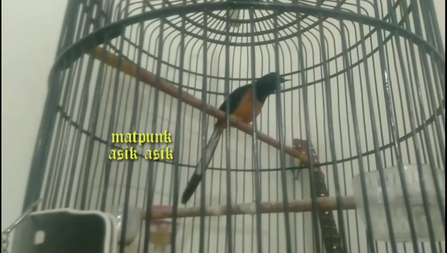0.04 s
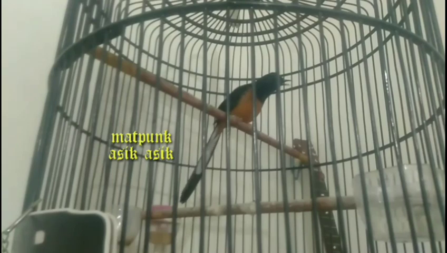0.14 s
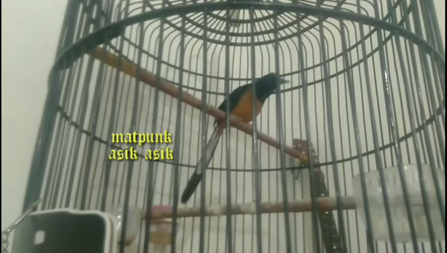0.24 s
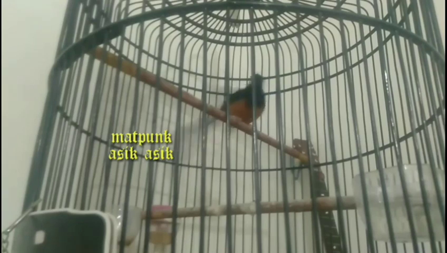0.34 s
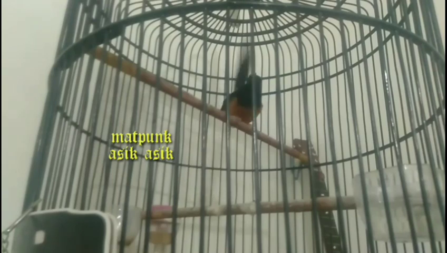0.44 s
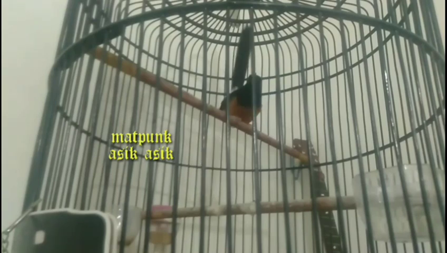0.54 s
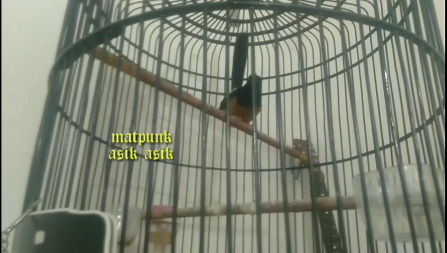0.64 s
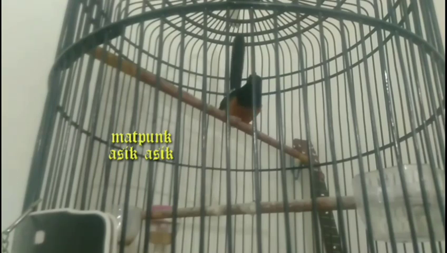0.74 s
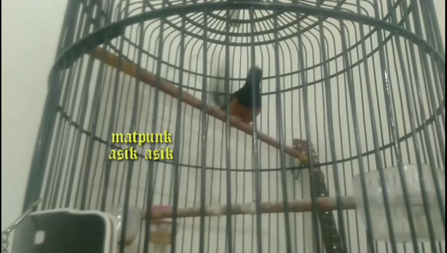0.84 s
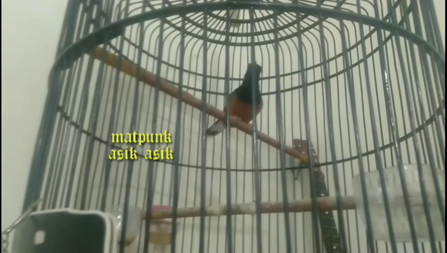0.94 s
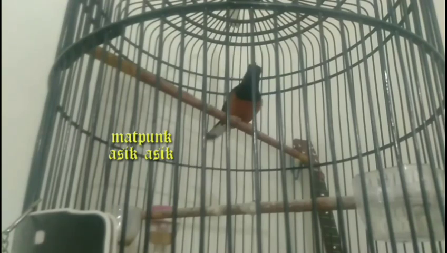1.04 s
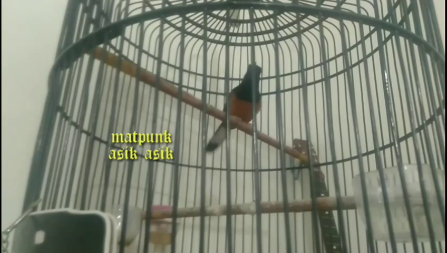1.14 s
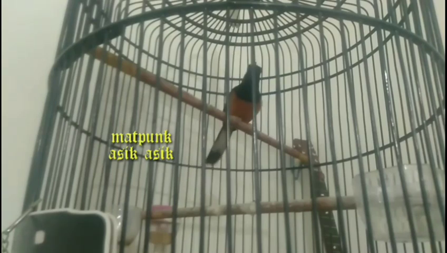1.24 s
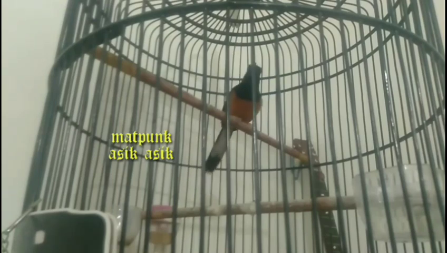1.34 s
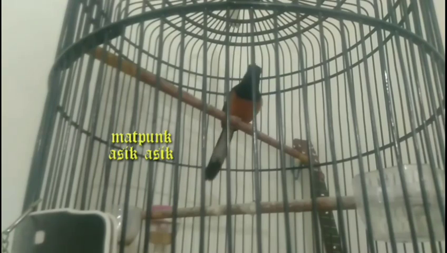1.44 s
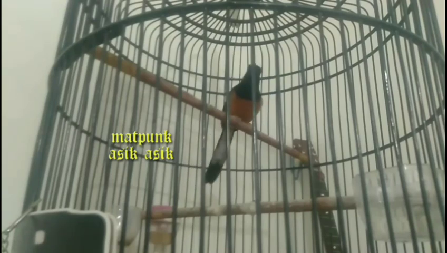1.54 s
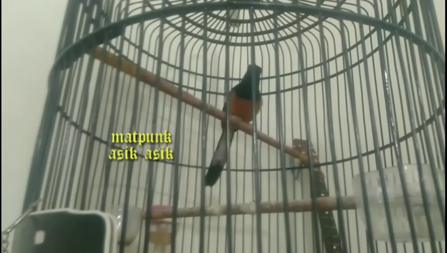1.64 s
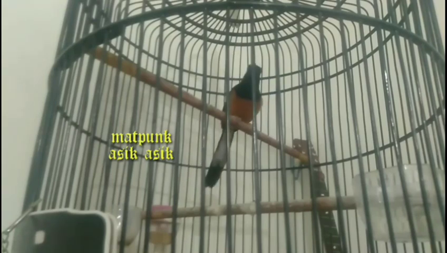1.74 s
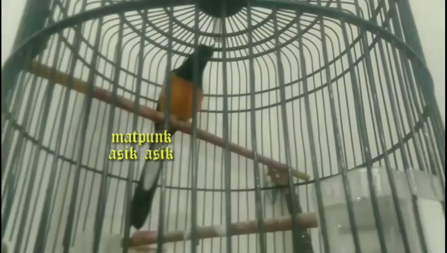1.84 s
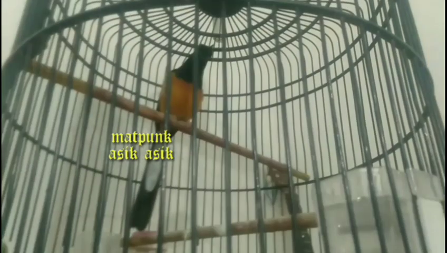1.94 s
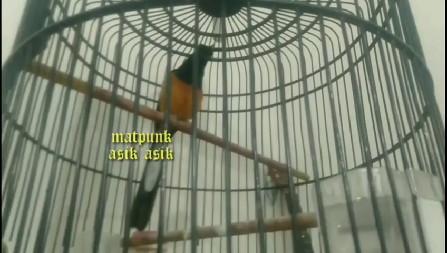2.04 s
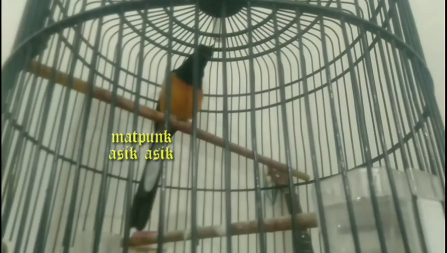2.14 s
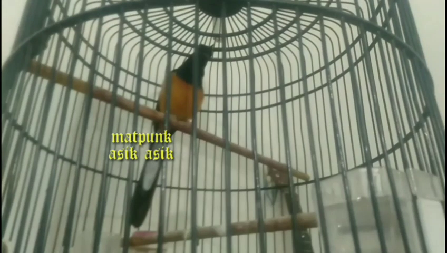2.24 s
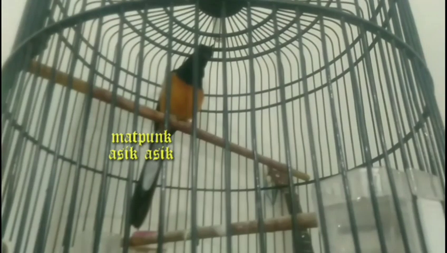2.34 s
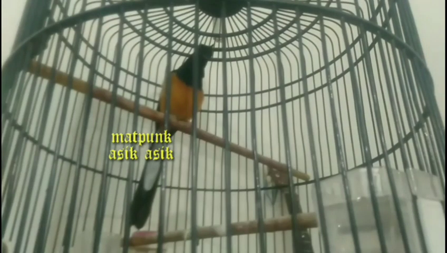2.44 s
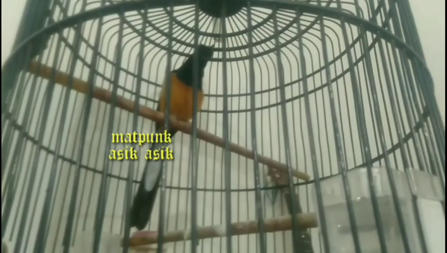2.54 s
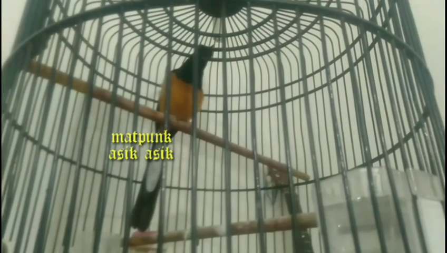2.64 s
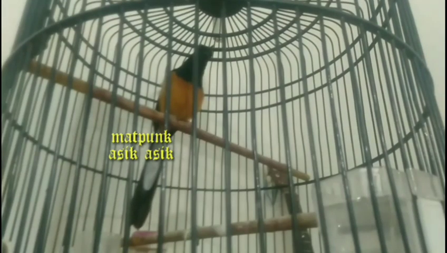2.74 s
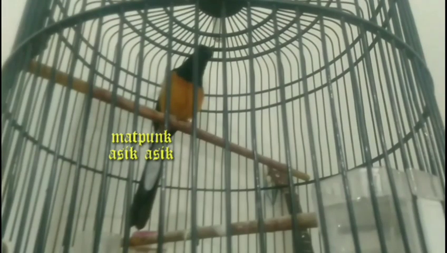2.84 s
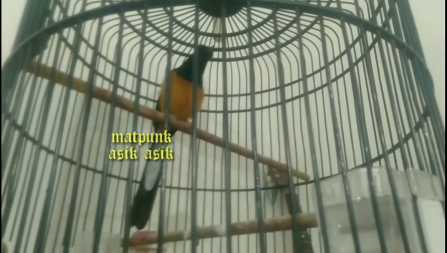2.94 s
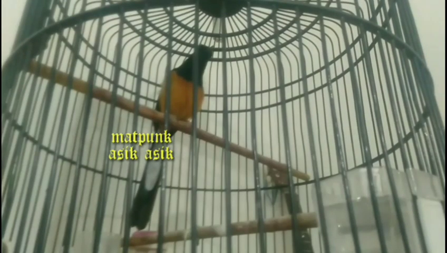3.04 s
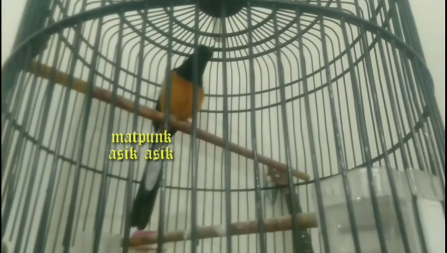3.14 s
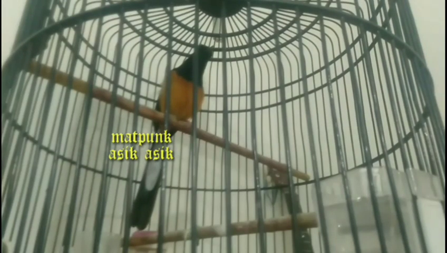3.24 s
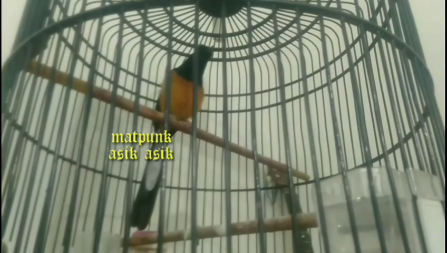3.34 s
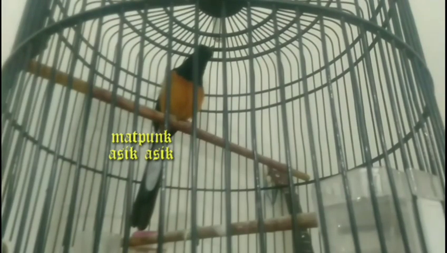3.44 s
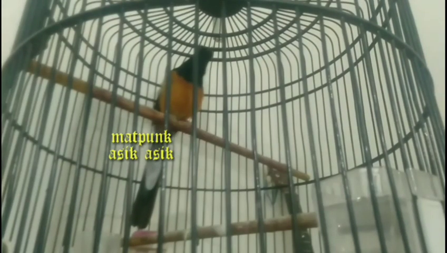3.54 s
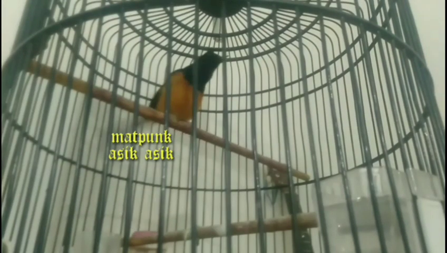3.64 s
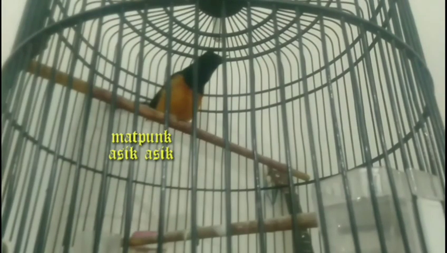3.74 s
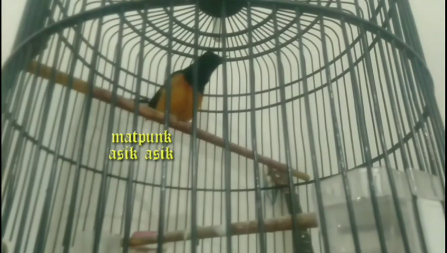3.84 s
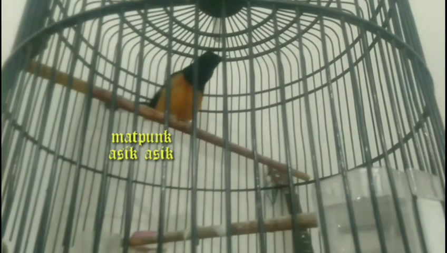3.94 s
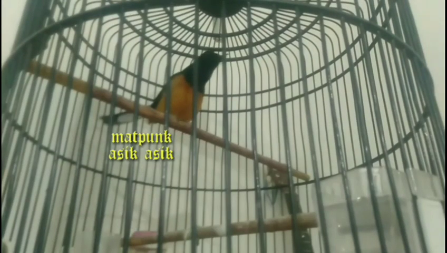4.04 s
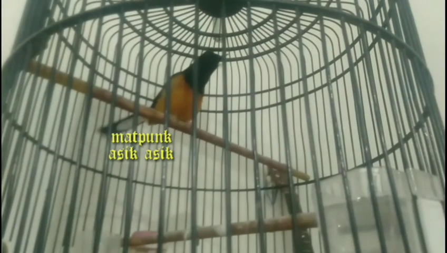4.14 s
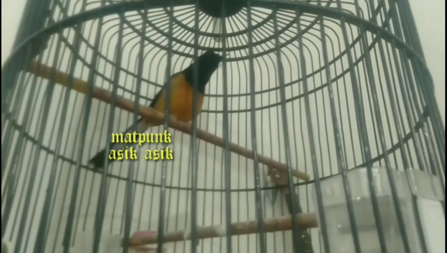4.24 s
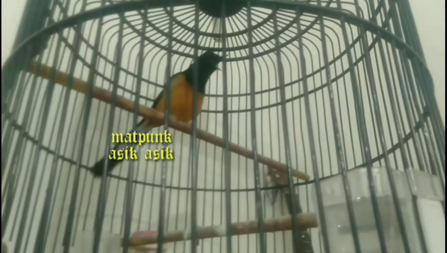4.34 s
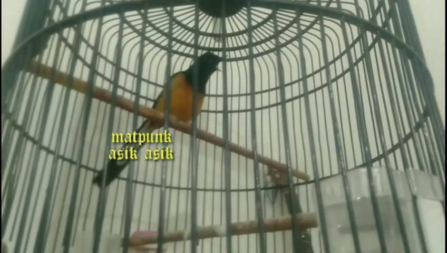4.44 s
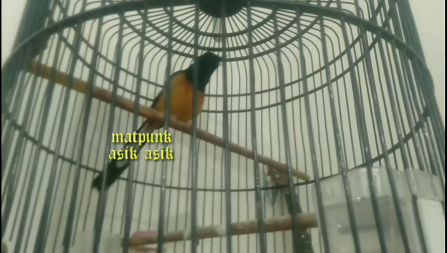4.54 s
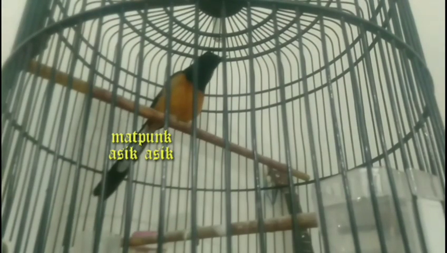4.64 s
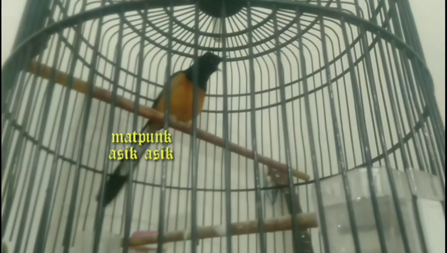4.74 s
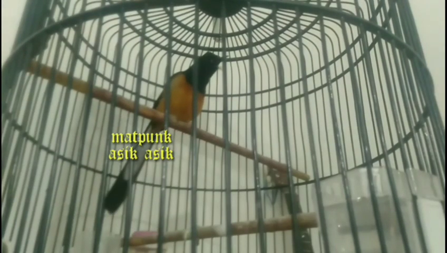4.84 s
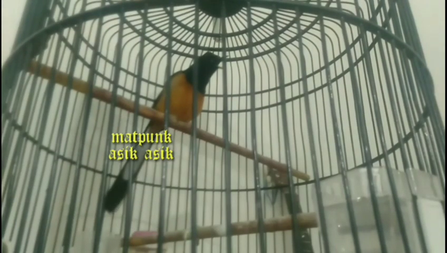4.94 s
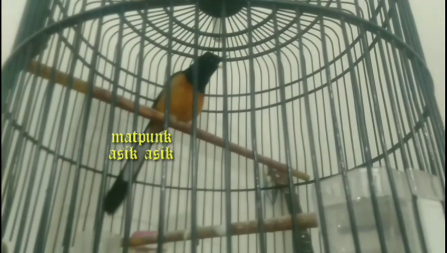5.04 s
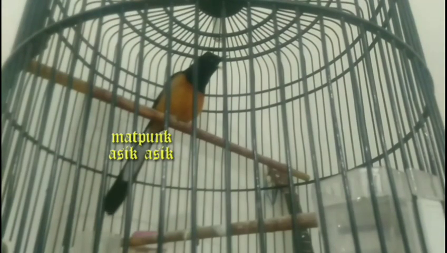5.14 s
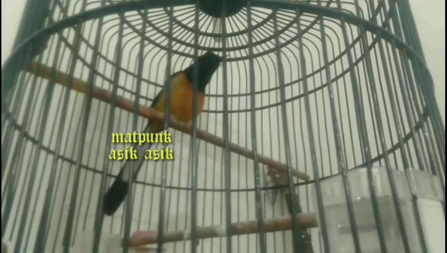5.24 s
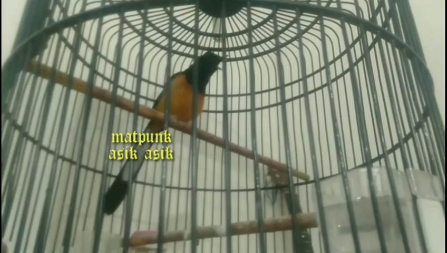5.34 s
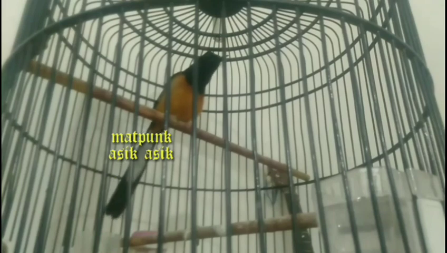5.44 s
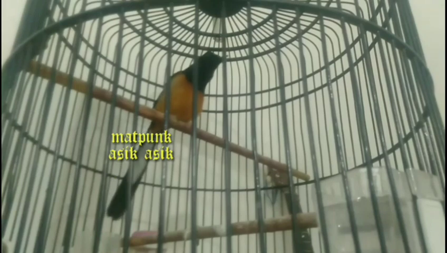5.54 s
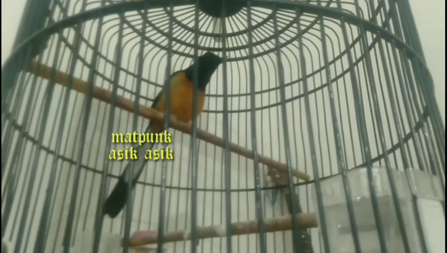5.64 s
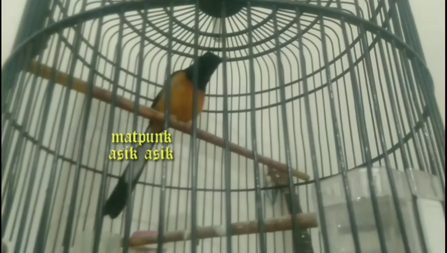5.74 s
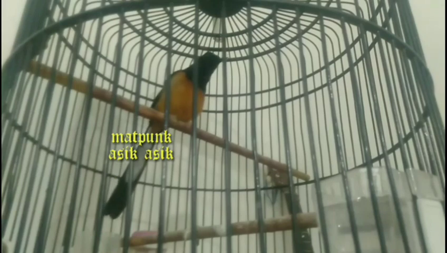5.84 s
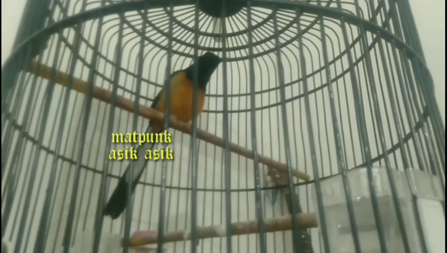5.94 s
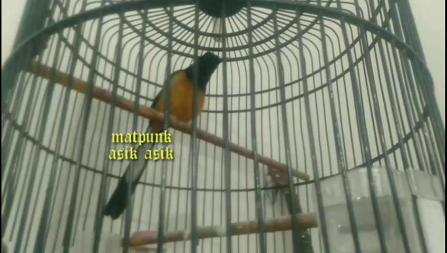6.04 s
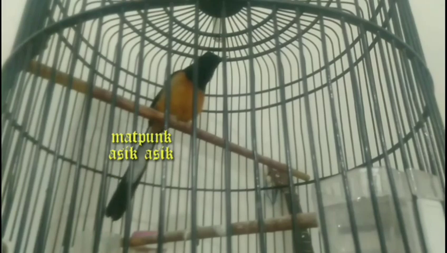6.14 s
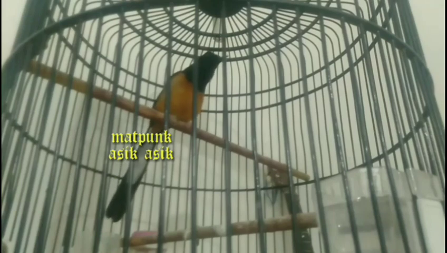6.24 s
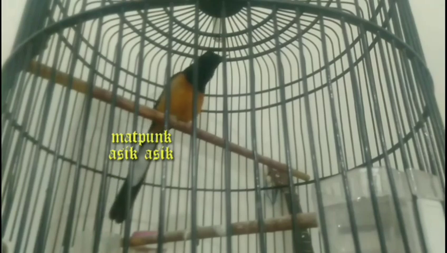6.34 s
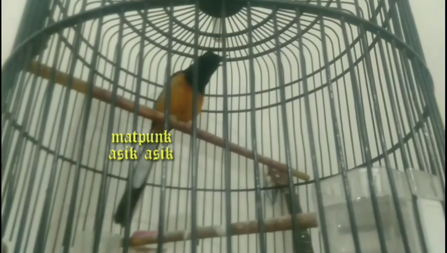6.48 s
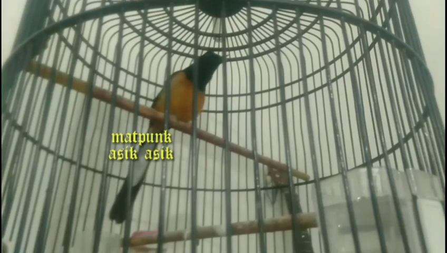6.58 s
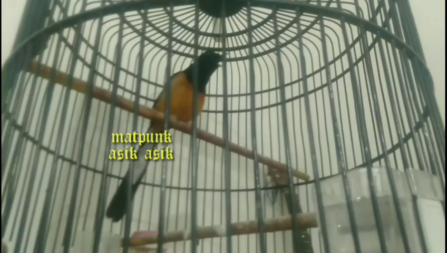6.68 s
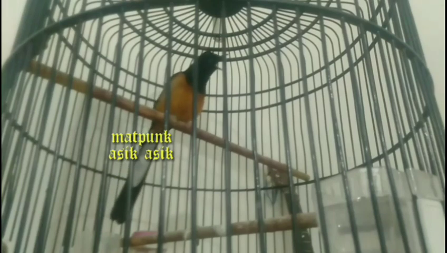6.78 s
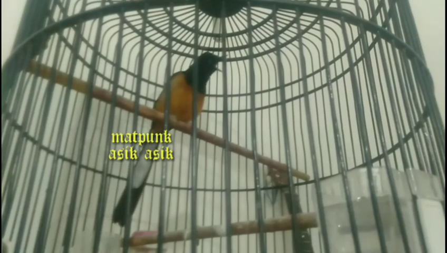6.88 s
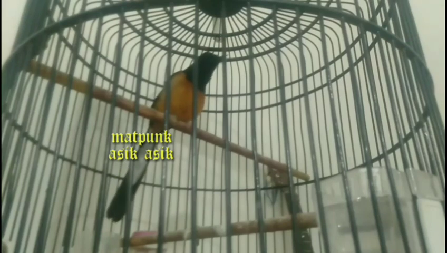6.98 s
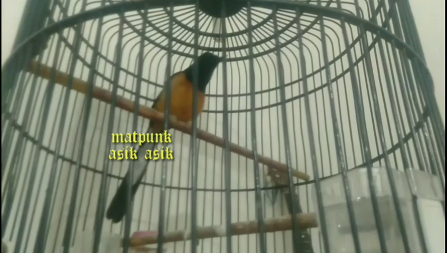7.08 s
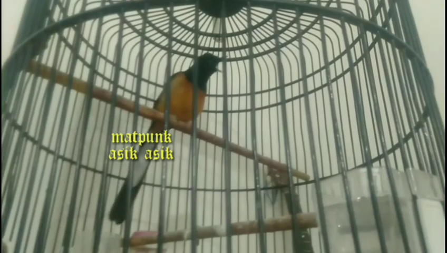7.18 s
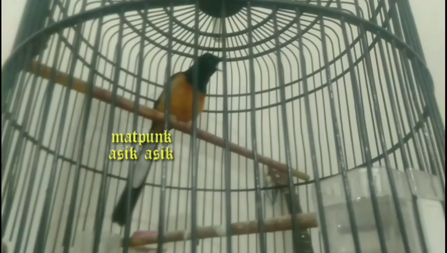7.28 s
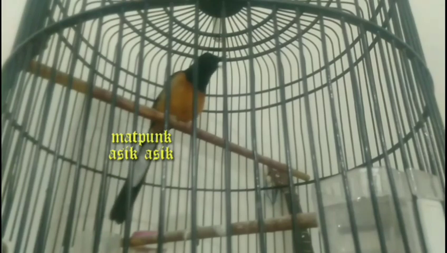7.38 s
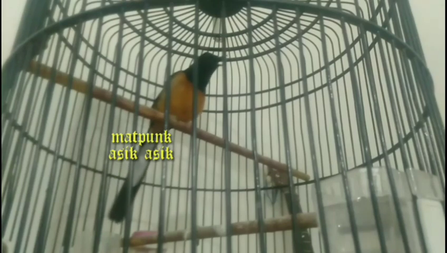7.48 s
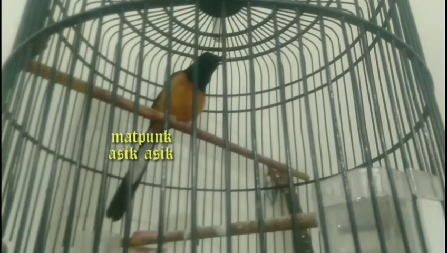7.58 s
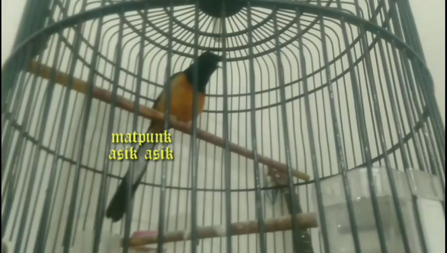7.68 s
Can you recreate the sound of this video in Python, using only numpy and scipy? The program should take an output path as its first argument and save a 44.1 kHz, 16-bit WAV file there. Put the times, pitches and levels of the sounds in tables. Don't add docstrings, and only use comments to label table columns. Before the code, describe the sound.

A caged songbird sings loud piercing whistles, rattling chirps and quick warbles close up in a bare echoing room, with one sharp dry click.

```python
import sys
import numpy as np
from scipy import signal
from scipy.fft import rfft, irfft
from scipy.io import wavfile
from scipy.ndimage import uniform_filter1d

SR = 44100
rng = np.random.default_rng(int(sys.argv[2]) if len(sys.argv) > 2 else 0)


def gain_from_db(level_db):
    decades = np.asarray(level_db, float) / 20
    return 10 ** decades


def bounce(signal):
    frames = np.transpose(np.atleast_2d(signal))
    limited = np.clip(frames, -1, 1)
    pcm = np.round(limited * 32767).astype(np.int16)
    wavfile.write(sys.argv[1], SR, pcm)


N = 340011
T = np.arange(N) / SR
HOARSE = 0.05


def noise(hz_lo, hz_hi):
    band = signal.butter(2, [hz_lo, hz_hi], "band", fs=SR, output="sos")
    x = signal.sosfilt(band, rng.standard_normal(N))
    return x / x.std()


def coloured(points, size=N):
    even = size + size % 2
    hz, db = np.transpose(points)
    log_hz = np.log(np.arange(even // 2 + 1) * SR / even + 1)
    x = irfft(rfft(rng.standard_normal(even)) * gain_from_db(np.interp(log_hz, np.log(hz), db)), even)
    return x[:size] / x.std()


def tracks(notes, edge_s=0.0012):
    hz, size = np.zeros(N), np.zeros(N)
    for s, f, db in map(np.transpose, notes):
        on = (T >= s[0]) & (T < s[-1])
        edge = np.clip(np.minimum(T[on] - s[0], s[-1] - T[on]) / edge_s, 0, 1)
        hz[on] = uniform_filter1d(np.interp(T[on], s, f), size=300, mode="nearest")
        size[on] = np.sqrt(2) * gain_from_db(np.interp(T[on], s, db)) * edge
    return hz, size


def shaped(shape, rows):
    return [[(s + u * length, from_hz + (to_hz - from_hz) * glide, db + rel_db) for u, glide, rel_db in shape]
            for s, length, from_hz, to_hz, db in rows]


def breathed(courses, breath, levels_db):
    out = []
    u, rel_db = np.transpose(breath)
    for (s, hz), db in zip(map(np.transpose, courses), levels_db):
        at = s[0] + u * (s[-1] - s[0])
        t = np.union1d(s, at)
        out.append(np.transpose([t, np.interp(t, s, hz), db + np.interp(t, at, rel_db)]))
    return out


def phase_of(hz, jitter=0.0031):
    return 2 * np.pi * np.cumsum(hz * (1 + jitter * noise(20, 210))) / SR


def sing(phase, size, overtones_db):
    on, out = size > 0, np.zeros(N)
    step, turn = np.gradient(phase)[on], phase[on]
    haze = 1 + gain_from_db(-13) * noise(100, 750)[on]
    tone = np.sin(turn)
    for k, db in enumerate(overtones_db, 2):
        below_nyquist = k * step < 2.6
        tone += haze * gain_from_db(np.broadcast_to(db, N)[on]) * np.sin(k * turn) * below_nyquist
    shimmer = gain_from_db(1.5 * noise(27, 110)[on])
    out[on] = tone * size[on] * shimmer
    return out


def voice(notes, overtones_db, jitter=.003):
    hz, size = tracks(notes)
    return sing(phase_of(hz, jitter), size, overtones_db)


# (frequency [Hz], level [dB])
TRACT = [(1500, -17.5), (2300, -35.5), (3500, -50), (4700, -45.5), (5700, -51.5), (6500, -53), (7600, -35),
         (10000, -37), (13000, -13), (16000, -32)]
OVERTONES_DB = [5, 2, 2.5, 1.5]


def overtones(hz):
    tract_hz, keep_db = np.transpose(TRACT)
    levels = []
    for k, db in enumerate(OVERTONES_DB, 2):
        thinning_db = -8 * (k - 2) * np.log2(hz / 1200 + 0.08)
        levels.append(db + thinning_db + np.interp(np.log(k * hz + 1), np.log(tract_hz), keep_db))
    return levels


# (resonance [Hz], half width [Hz], leak [dB], octave [dB],
# rasp [dB], rasp from [Hz], rasp to [Hz])
THROATS = [
    (4750, 350, -2.5, -23, -25.5, 3300, 20000),
    (3103, 520, -33, -74.5, -53, 4300, 6000),
]


def through_throat(hz, size, throat, jitter):
    centre_hz, width_hz, leak_db, octave_db, rasp_db, *rasp_hz = throat
    phase = phase_of(hz, jitter)
    gain = 1 / (1 + ((hz - centre_hz) / width_hz) ** 2) + gain_from_db(leak_db) * (hz < centre_hz)
    escaped = gain_from_db(octave_db) * np.sin(2 * phase) + gain_from_db(rasp_db) * noise(*rasp_hz)
    return sing(phase, size * gain, overtones(hz)) + size * escaped


MIXES = [(2, 0), (1, 1), (2, 1), (-1, 1), (3, -1), (-1, 2), (3, 0)]
MIX_DB = [-10.5, -14.5, -20.5, -24, -20, -30, -20]


def duet(left, left_size, notes, overtones_db, mix_db, jitter=0.0027, order=0):
    hz, size = tracks(notes)
    right = phase_of(hz, jitter)
    out, on = sing(right, size, overtones_db), size > 0
    left_step, right_step = np.gradient([left, right], axis=1)[:, on]
    both = np.sqrt(left_size * size)[on]
    for (m, n), db in zip(MIXES[order:], MIX_DB[order:]):
        step = m * left_step + n * right_step
        audible = np.clip(step / 0.17 - 1, 0, 1) * (step < 2.6)
        out[on] += gain_from_db(db + mix_db) * both * np.sin(m * left[on] + n * right[on]) * audible
    return out


# (frequency [Hz], density [dB per Hz])
RUMBLE = [(15, -20), (25, -9), (42, -10), (52, 2), (62, -5), (79, -4), (120, -13), (155, -11), (200, -17),
          (260, -20), (340, -40)]
# (time [s], level [dB])
TRAFFIC = [(0, -47), (.8, -44), (1.15, -50.5), (1.8, -46), (2.0, -52.5), (3.7, -50.5), (4.0, -58.5),
           (4.5, -56), (5.1, -49.5), (5.75, -56.5), (6.2, -51), (7.71, -50)]
# (frequency [Hz], density [dB per Hz])
HUM = [(150, -21), (260, -11), (498, -10.5), (581, -6.5), (1150, -17), (1280, -13), (3810, -26),
       (4680, -35), (15500, -25.5)]


def background():
    traffic_db = np.interp(T, *np.transpose(TRAFFIC)) - noise(0.89, 2.9)
    hum_db = -56 + 0.34 * noise(0.89, 2.4)
    return coloured(RUMBLE) * gain_from_db(traffic_db) + coloured(HUM) * gain_from_db(hum_db)


# (share of length [0-1], share of glide [0-1], level [dB])
FAR_FADE = [(0, 0.1, -13), (.15, 0.0018, 3.5), (.6, 0.53, -3.5), (1, 0.94, -7)]
# (time [s], length [s], from [Hz], to [Hz], level [dB])
FAR_FADES = [
    (.0, 0.009, 2254, 1510, -27.5),
    (1.42, 0.33, 2464, 2345, -32),
]
# (share of length [0-1], share of glide [0-1], level [dB])
FAR_ARCH = [(0, 0, -3), (.3, 1, 0), (1, .4, -1.5)]
# (time [s], length [s], from [Hz], to [Hz], level [dB])
FAR = [
    (1.768, .13, 2830, 3050, -43),
    (3.6, .16, 3400, 3100, -60),
    (1.99, .13, 1790, 1810, -42),
    (2.95, .64, 620, 590, -60),
    (3.8, .05, 4400, 4900, -49),
    (6.17, .09, 1900, 2400, -52),
]
# (time [s], length [s], from [Hz], to [Hz], level [dB])
FAR_OVER = [
    (3.185, .085, 4300, 4750, -53),
]


def far_birds():
    others = voice(shaped(FAR_ARCH, FAR) + shaped(FAR_FADE, FAR_FADES), [-30], jitter=.006)
    return others + voice(shaped(FAR_ARCH, FAR_OVER), [-30], jitter=.006)


# (frequency [Hz], t60 [s], level [dB])
ROOM = [(520, 0.2, -9), (1200, 0.54, -2), (2400, 0.51, -2), (4000, 0.45, -1), (6800, 0.39, -4),
        (14900, 0.31, 5.5)]
# (delay [s], level over the tail [dB])
ECHOES = [
    (.0032, 12.5),
    (.009, 9),
    (.016, 10.5),
]


def room():
    t, tail = T[:SR], 0
    for hz, t60, db in ROOM:
        around = [(hz / 2.42, -40), (hz / 1.4, 0), (hz * 1.085, 0), (hz * 4.5, -40)]
        tail = tail + gain_from_db(db - 60 * t / t60) * coloured(around, size=SR) * np.sqrt(hz)
    clusters = sum(gain_from_db(db) * np.exp(-((t - s) / 0.00064) ** 2) for s, db in ECHOES)
    build_up = 1 - np.exp(-t / .008)
    tail = tail * (build_up + clusters)
    return tail * gain_from_db(2) / np.sqrt(np.sum(tail ** 2))


# (time [s], length [s], from [Hz], to [Hz], level [dB])
OPENING = [(0, .05, -41.5), (.3, .2, -22.5), (.47, .4, 3.5), (.66, .7, -1.5), (.82, .94, -8.5),
           (1, 1, -9.5)]
OPENINGS = [
    (.037, .053, 3689, 5220, -6),
    (1.25, .058, 3558, 5437, -10.5),
]
SCOOP = [(0, 0, -21), (.32, .6, 3), (.55, 0.91, -1), (1, 1, 0.5)]
SCOOPS = [
    (4.392, .036, 1950, 2350, -21),
    (5.415, .054, 1950, 2430, -10.5),
]
JUMP = [(0, 0, -3), (.1, .72, 0), (.25, .96, 0), (.9, 1, -1), (1, 0.95, -12)]
JUMPS = [
    (4.238, .08, 2099, 2372, -7.5),
    (6.55, .103, 2050, 2440, -6.5),
]
DROP = [(0, 0.085, -22.5), (.12, 0.064, -7), (.5, .3, 3), (.75, .58, -3), (1, 0.94, -8.5)]
DROPS = [
    (4.738, .11, 1586, 965.4, -14.5),
    (7.156, .098, 1571, 931, -14.5),
]
# (time [s], pitch [Hz], level [dB])
BENDS = [
    [(.971, 1397, -35.5), (.979, 1478, -20.5), (.99, 1776, -13), (1.01, 1813, -13.5), (1.03, 2171, -7.5),
     (1.048, 2400, -4), (1.075, 2423, -9), (1.088, 2400, -14.5)],
    [(3.684, 741, -48.5), (3.69, 988, -35), (3.712, 1073, -14), (3.728, 1134, -31), (3.74, 1154, -20),
     (3.752, 1144, -21), (3.762, 1037, -12), (3.768, 933, -26), (3.774, 828, -30.5)],
    [(3.824, 1412, -31.5), (3.835, 1606, -20), (3.852, 1769, -1), (3.885, 1950, -13), (3.91, 2060, -3),
     (3.94, 2160, -17.5), (3.96, 2200, -20), (3.99, 2210, -13.5), (4.025, 2206, -22)],
]
# (time [s], pitch [Hz], level [dB])
RISES = [
    [(4.084, 1417, -35), (4.105, 1447, -20), (4.14, 1493, -15.5), (4.15, 1484, -3), (4.172, 1508, -10),
     (4.2, 1573, -13.5), (4.222, 1697, -15), (4.237, 1842, -10.5)],
    [(6.283, 700, -54), (6.291, 997, -35.5), (6.33, 1120, -22.5), (6.405, 1137, -31), (6.414, 1173, -11.5),
     (6.436, 1239, -11), (6.445, 1259, -5.5), (6.48, 1318, -11.5), (6.515, 1456, -12), (6.548, 1758, -11)],
]
# (time [s], pitch [Hz])
SWEEPS = [
    [(2.603, 2780), (2.654, 2830), (2.7, 3050), (2.734, 3300), (2.82, 3880), (2.85, 3890)],
    [(4.428, 2420), (4.45, 2650), (4.47, 2960), (4.49, 3130), (4.55, 3300), (4.6, 3500), (4.67, 3880),
     (4.688, 3880)],
    [(5.469, 2720), (5.515, 2900), (5.579, 2950), (5.607, 2880), (5.622, 2620), (5.64, 2230), (5.67, 2050)],
    [(6.765, 1700), (6.779, 2060), (6.8, 2250), (6.83, 2400), (6.87, 2620), (6.892, 2900), (6.95, 3120),
     (7.0, 3400), (7.06, 3965), (7.088, 3965)],
]
# (share of length [0-1], level [dB]), and each one's level [dB]
SWEEP_BREATH = [(0, -11), (.06, -3), (.3, -5.5), (0.547, -3.5), (0.922, -4.5), (1.001, -6)]
SWEEP_DB = [-8, -6, -6, -5.5]
# (time [s], pitch [Hz])
FALLS = [
    [(1.977, 4310), (1.995, 4290), (2.027, 4120), (2.1, 3930), (2.125, 3850), (2.163, 3890)],
    [(4.902, 4340), (4.95, 4010), (4.975, 3900), (5.008, 3760), (5.028, 3500), (5.05, 3530)],
]
# (share of length [0-1], level [dB]), and each one's level [dB]
FALL_BREATH = [(0, -24), (.05, -12.5), (.35, -12), (.7, -7.5), (0.849, 1.5), (1, -7.5)]
FALL_DB = [-6, -6]
# (time [s], pitch [Hz])
LAST_FALL = [
    [(7.31, 4455), (7.338, 4372), (7.39, 4175), (7.436, 3884), (7.45, 3800), (7.468, 3125), (7.484, 2888),
     (7.499, 3100)],
]
# (share of length [0-1], level [dB]), and its level [dB]
LAST_FALL_BREATH = [(0, -16), (.13, -3.5), (.36, -24.5), (0.561, -11), (0.681, -0.5), (0.93, -6), (1, -6.5)]
LAST_FALL_DB = [-5.5]


def whistles():
    long_notes = breathed(SWEEPS, SWEEP_BREATH, SWEEP_DB) + breathed(FALLS, FALL_BREATH, FALL_DB)
    long_notes += breathed(LAST_FALL, LAST_FALL_BREATH, LAST_FALL_DB)
    short_notes = shaped(OPENING, OPENINGS) + shaped(SCOOP, SCOOPS) + shaped(JUMP, JUMPS) + shaped(DROP, DROPS)
    return BENDS + RISES + long_notes + short_notes


# (from [s], to [s], rate [Hz], depth [0-1], extra push [dB])
FLUTTER = [(.985, 1.03, 150, .85, 4), (1.03, 1.09, 110, .7, 1), (2.588, 2.7, 54, 1, 2),
           (2.7, 2.78, 48, .6, 0), (4.178, 4.236, 47, .9, 3), (4.252, 4.318, 52, .6, 0),
           (4.43, 4.68, 55, .6, 0), (5.475, 5.625, 44, .8, 1), (5.625, 5.67, 44, .8, -4),
           (6.478, 6.55, 70, .9, 2), (6.6, 6.655, 70, .5, 0), (6.8, 6.835, 52, .6, 0),
           (6.835, 6.89, 60, 1, 0), (6.89, 7.06, 52, .6, 0)]


def flutter():
    gain, bend, rough = np.ones(N), np.zeros(N), noise(60, 360)
    sharpness = 1.6
    for start, end, hz, depth, push_db in FLUTTER:
        on = (T >= start) & (T < end)
        turn = 2 * np.pi * hz * (T[on] - start)
        pulse = sharpness ** .5 * (.5 + .5 * np.sin(turn)) ** sharpness
        gain[on] = gain_from_db(push_db) * (1 - depth + 2 * depth * pulse)
        bend[on] = depth ** 2 * (.025 * rough[on] - .03 * np.cos(turn))
    smooth_gain = uniform_filter1d(uniform_filter1d(gain, size=110), size=110)
    return smooth_gain, 1 + bend


def left_voice():
    hz, size = tracks(whistles())
    breath, bend = flutter()
    phase = phase_of(hz * bend)
    richness_db = 8 - 0.68 * 20 * np.log10(size * 10 + 0.21)
    return phase, size, sing(phase, size * breath, overtones(hz) + richness_db)


# (share of length [0-1], share of glide [0-1], level [dB])
PAIR = [(0, .4, -30), (.3, .15, -12), (.5, 0.025, -2), (.6, .02, -10), (.72, 0.03, -5), (.78, .12, -17),
        (.85, .45, -25), (1, 0.97, -25)]
# (time [s], length [s], from [Hz], to [Hz], level [dB])
PAIRED = [
    (0.054, .075, 2949, 1394, -4),
    (1.278, .062, 3340, 1623, -6.5),
]


def harsh_under_notes(left, left_size):
    return duet(left, left_size, shaped(PAIR, PAIRED), [-26, -30], -4, HOARSE / 2)


# (time [s], length [s], top [Hz], level [dB])
CHIRPS = [
    (.101, .018, 5000, -16),
    (.1205, .024, 5350, -8),
    (.151, .026, 6050, -6),
    (.1865, .028, 6100, -9),
    (.218, .016, 4600, -20),
    (1.322, .018, 5000, -19),
    (1.341, .021, 5150, -11),
    (1.371, .0235, 5900, -7.5),
    (1.402, .027, 5850, -8),
    (1.432, .022, 4900, -19),
]


def chirps():
    hz, size = np.zeros(N), np.zeros(N)
    for s, length, top_hz, db in CHIRPS:
        on = (T >= s) & (T < s + length)
        u = (T[on] - s) / length
        rising = u < .4
        foot_hz = np.where(rising, 3000, 1950)
        rounded = np.where(rising, np.sin(np.pi / 2 * u / .4), np.cos(np.pi / 2 * (u - .4) / .6))
        pointed = np.where(rising, u / .4, (1 - u) / 0.65)
        hz[on] = foot_hz + (top_hz - foot_hz) * (rounded + pointed) / 2
        size[on] = np.sqrt(2) * gain_from_db(db) * np.sqrt(np.abs(np.sin(np.pi * u)))
    return through_throat(hz, size, THROATS[0], jitter=.012)


# (time [s], pitch [Hz], level [dB])
GROWLS = [
    [(.104, 2494, -23.5), (.125, 1900, -23), (.17, 2100, -22.5), (.225, 2000, -27.5)],
    [(.977, 1480, -22), (.99, 1674, -19.5), (1.01, 1753, -21.5)],
    [(1.322, 2700, -25.5), (1.35, 2031, -25), (1.4, 2204, -29.5), (1.45, 2127, -32)],
]


def growls():
    return voice(GROWLS, [-30], jitter=.13)


CLICKS_S = [
    .5142,
    .962,
    5.408,
    6.752,
]
CLICKS_DB = [-16.5, -38, -35, -40.5]
# (frequency [Hz], density [dB per Hz])
CLICK_COLOUR = [(180, -61), (300, -13.5), (498, -38), (738, -3), (2070, 0.5), (2920, 0), (5530, -8.5),
                (6620, -23.5), (15000, -29)]
# (frequency [Hz], level [dB], t60 [s])
CAGE_RING = (760, -38, 0.51)


def click():
    shape, rise_s, decay_s = 0, .0008, 0.011
    for s, db in zip(CLICKS_S, CLICKS_DB):
        t = np.maximum(T - s, 0)
        shape = shape + gain_from_db(db) * np.exp(-t / decay_s) * np.clip(t / rise_s, 0, 1)
    hz, db, t60 = CAGE_RING
    t = np.maximum(T - CLICKS_S[0], 0)
    ring = gain_from_db(db - 60 * t / t60) * np.sin(2 * np.pi * hz * t)
    return shape * coloured(CLICK_COLOUR) + ring


# (time [s], pitch [Hz], level [dB])
SQUEALS = [
    [(1.972, 6850, -48), (1.99, 6980, -31.5), (2.011, 7083, -24), (2.04, 6910, -25.5), (2.1, 6830, -28),
     (2.125, 6200, -40), (2.15, 5350, -41.5)],
    [(4.897, 6500, -45), (4.915, 6960, -27), (4.95, 6850, -24.5), (4.975, 6500, -25), (5.0, 5900, -35.5),
     (5.015, 5300, -34.5), (5.028, 4700, -43.5)],
    [(7.3, 5300, -56.5), (7.308, 6750, -38), (7.322, 7051, -25), (7.385, 6931, -24), (7.41, 6650, -32),
     (7.45, 5850, -43.5), (7.495, 5050, -47.5)],
]
# (time [s], pitch [Hz], level [dB])
DIVE = [(2.144, 5004, -40.5), (2.15, 3500, -29.5), (2.159, 2123, -25)]


def squeals(left, left_size):
    return duet(left, left_size, SQUEALS + [DIVE], [0.5], 0)


# (time after the start [s], pitch [Hz])
SHORT_WARBLE = [(0, 1700), (.011, 3750), (.02, 2950), (.027, 3400), (.038, 2350)]
RISING_WARBLE = [(0, 1550), (.013, 3400), (.019, 2600), (.027, 3350), (.034, 3000), (.043, 3650),
                 (.05, 3100), (.058, 2550)]
CLOSING_WARBLE = [(0, 1570), (.013, 3300), (.02, 2400), (.031, 3450), (.038, 2900), (.045, 3350),
                  (.056, 2450)]
ARCHING_WARBLE = [(0, 1600), (.015, 3450), (.021, 2650), (.041, 3850), (.049, 3400), (.056, 3600)]
WEAK_WARBLE = [(0, 1900), (.002, 2100), (.011, 3150), (.017, 2350), (.027, 3250), (.041, 2200)]
# (time [s], stretch [1], pitch factor [1], first level [dB], last level [dB])
WARBLES = [
    [(2.197, 0.97, 0.99, -0.5, -9), (5.093, 0.85, 1, 1.5, -10.5)],
    [(2.352, 1, 0.96, -3.5, -9), (5.175, 0.57, 0.94, -5, -3)],
    [(2.45, 1, 1, 4, -12), (5.272, 1, 1.03, -1.5, -11)],
    [(7.55, 0.94, 0.99, -7, -2), (7.658, 0.92, 0.97, -13.5, -6.5)],
    [(2.275, 0.97, 1, -11.5, -8.5)],
]


def warbles():
    hz, size = np.zeros(N), np.zeros(N)
    patterns = [SHORT_WARBLE, RISING_WARBLE, CLOSING_WARBLE, ARCHING_WARBLE, WEAK_WARBLE]
    for pattern, rows in zip(patterns, WARBLES):
        for start, stretch, pitch, *db in rows:
            s, f = np.transpose(pattern) * [[stretch], [pitch]] + [[start], [0]]
            on = (T >= s[0]) & (T < s[-1])
            place = np.interp(T[on], s, np.arange(len(s)))
            k = place.astype(int)
            hz[on] = f[k] + (f[k + 1] - f[k]) * np.sin(np.pi / 2 * (place - k)) ** 2
            flick = gain_from_db(-18.5 * np.clip((s[1] + .004 - T[on]) / 0.0061, 0, 1))
            release = np.clip((s[-1] - T[on]) / 0.00069, 0, 1)
            size[on] = np.sqrt(2) * gain_from_db(np.interp(T[on], s[[0, -1]], db)) * flick * release
    return through_throat(hz, size, THROATS[1], jitter=.004)


# (share of length [0-1], share of glide [0-1], level [dB])
LOW = [(0, 0.2, -4), (.3, .3, -3.5), (.7, .8, 0), (1, 0.88, -11.5)]
# (time [s], length [s], from [Hz], to [Hz], level [dB])
LOW_NOTES = [
    (2.569, .018, 1574, 1928, -14),
    (2.586, .115, 1836, 2023, -16),
    (4.402, .05, 1114, 1297, -31),
    (5.43, 0.03, 1200, 1277, -28),
    (5.663, 0.055, 1266, 1236, -21),
    (6.774, .05, 1123, 1181, -26),
    (6.835, 0.12, 1782, 2056, -15),
]


def hoarse_notes(left, left_size):
    throb = 1 + 0.3 * np.sin(2 * np.pi * 50 * T)
    return duet(left, left_size, shaped(LOW, LOW_NOTES), [-8], -11.5, HOARSE, order=1) * throb


# (time [s], pitch [Hz], level [dB])
THROBS = [
    [(4.453, 1527, -29), (4.49, 1642, -16.5), (4.545, 1669, -30.5)],
    [(5.465, 1650, -17.5), (5.55, 1724, -16.5), (5.645, 1694, -21.5)],
]


def throbs(left, left_size):
    starts = np.array([note[0][0] for note in THROBS])
    since = T - starts[np.clip(np.searchsorted(starts, T) - 1, 0, None)]
    pulses = np.sin(np.pi * 43 * since) ** 4
    return duet(left, left_size, THROBS, [-12], -4.5, HOARSE, order=1) * pulses


def bird():
    left, size, song = left_voice()
    song = song + harsh_under_notes(left, size) + chirps() + growls()
    song = song + squeals(left, size) + warbles()
    return song + hoarse_notes(left, size) + throbs(left, size)


# (time [s], pitch [Hz], level [dB])
BEFORE_CUT = [
    [(1.7, 2955, -14), (1.8, 4000, -19)],
    [(1.84, 1545, -16.5), (1.9, 1330, -19.5), (1.935, 961, -20)],
]
# (time [s], level [dB])
CUT = [(1.84, -1), (1.88, -4.5), (1.93, -29.5), (1.935, -41), (1.96, -5), (2.0, 0.5)]


def scene():
    response, near = room(), bird() + click()
    sung = near + far_birds()
    before = T < 1.933
    first = signal.fftconvolve(sung * before, response)[:N]
    second = signal.fftconvolve(sung * ~before + voice(BEFORE_CUT, [-30]), response)[:N]
    fade = gain_from_db(np.interp(T, *np.transpose(CUT)))
    return ((near + np.where(before, first, second) + background()) * fade)[None]


def top_cut(x):
    return signal.sosfilt(signal.butter(12, 15750, fs=SR, output="sos"), x)


def record(dry):
    limit, knee = 0.69, 24
    flat = dry / (8.0 + np.abs(dry / limit) ** knee) ** (1 / knee)
    return top_cut(flat)


dry = scene()
out = record(dry)
bounce(out)
```